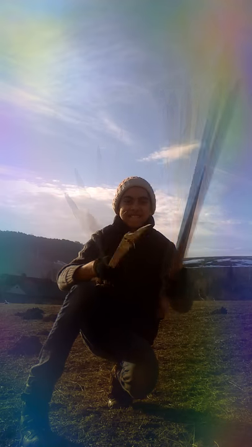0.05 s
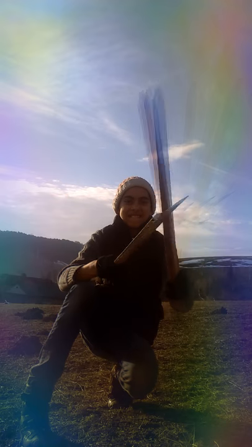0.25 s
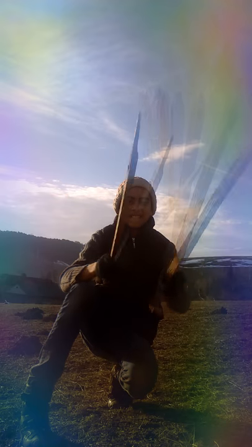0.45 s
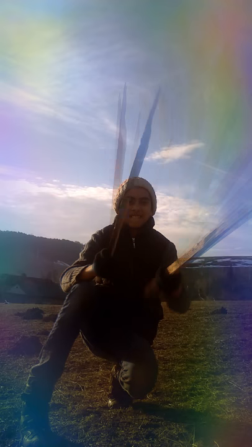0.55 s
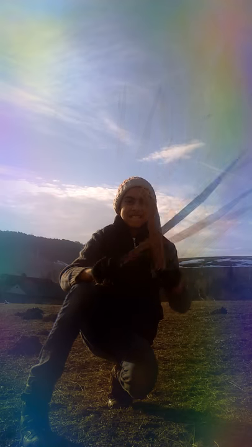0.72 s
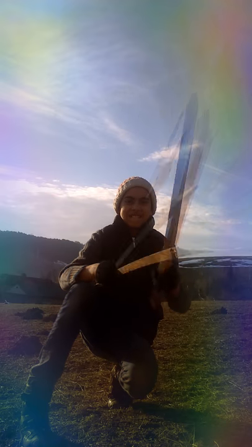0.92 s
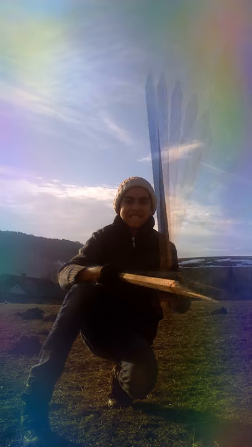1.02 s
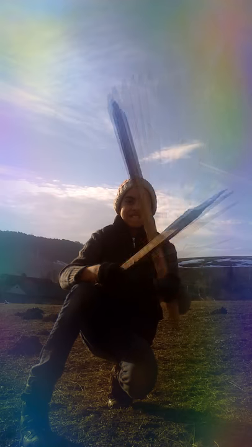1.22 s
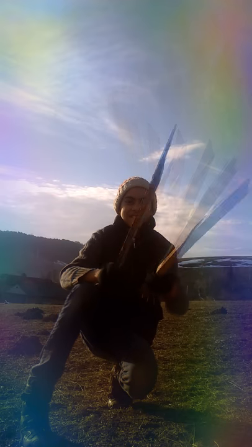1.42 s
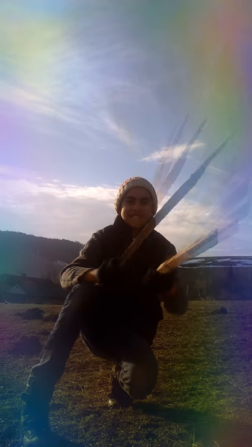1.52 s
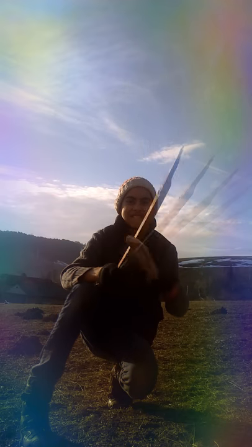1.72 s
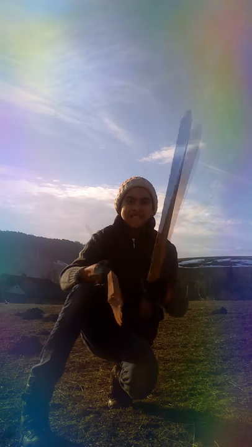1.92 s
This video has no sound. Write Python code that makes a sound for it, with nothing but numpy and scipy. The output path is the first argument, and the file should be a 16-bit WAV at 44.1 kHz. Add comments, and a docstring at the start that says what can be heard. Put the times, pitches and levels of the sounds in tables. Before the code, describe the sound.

In an open field, two swung wooden sticks clack sharply five times near the microphone, briefly scraping as they slide apart before the final knock. A faint low drone and soft air hiss lie behind them.

```python
"""Stick fight in an open field

Two wooden sticks knock together in five dry clacks, each a snap, a crack and a short ring with a quick
second contact; light scrapes follow as they slide apart. The swings push soft puffs of air. Behind them
a low engine-like drone slows under faint outdoor hiss. Two close microphone ports hear the bass in
nearly opposite phase, and a limiter ducks after the hardest clack."""
import sys
import numpy as np
from scipy import signal
from scipy.fft import rfft, irfft, next_fast_len
from scipy.io import wavfile
from scipy.ndimage import uniform_filter1d, minimum_filter1d, map_coordinates

SR = 44100
rng = np.random.default_rng(int(sys.argv[2]) if len(sys.argv) > 2 else 0)


def master(y):
    """Save y as 16-bit WAV."""
    cut = np.clip(np.atleast_2d(y).T, -1, 1)
    pcm = np.round(cut * 32767)  # scale
    wavfile.write(sys.argv[1], SR, pcm.astype(np.int16))


N = 85995

# colour of the air bed: freq_hz, level_db
HISS_EQ = [(20, 12), (55, 23), (100, 22.5), (170, 18.5), (280, 12.5), (600, 4), (1400, 1), (2600, 3),
           (3800, 1), (5200, -4), (14000, -6), (15600, -6), (16100, -35)]
# how alike the bed is left and right: freq_hz, correlation
HISS_CORRELATION = [(60, -0.92), (160, -0.93), (300, -0.61), (640, -.3), (1400, -0.13), (3100, 0.1),
                    (7000, 0)]
# the far drone winding down: time_s, firing_rate_hz, level_db
DRONE_PATH = [(0, 42.2, -57), (.2, 42, -56.5), (.35, 41.3, -59.5), (.8, 40.44, -59), (1.05, 39.53, -61.5),
              (1.4, 38, -64.5), (1.6, 37.7, -58.5), (1.95, 38, -62.5)]
# its harmonics: rate_multiple, level_db
DRONE_HARMONICS = [(1, -9), (2, 0.5), (3, -12.5), (4, -10), (5, -19.5)]
# air pushed at the microphone by the swings: centre_s, width_s, level_db
AIR_PUFFS = [(.02, .01, -67), (.078, .011, -62), (.222, 0.011, -60), (0.986, 0.017, -68.5)]
# bassy colour of a puff: freq_hz, level_db
PUFF_EQ = [(20, -6), (70, -0.5), (110, -3.5), (250, -24), (1000, -59.5)]
# bending modes of the hand-held sticks: pitch_hz, level_db, t60_s
WOOD_MODES = [(600, -10.5, .02), (790, -2, .015), (990, 3, .016), (1368, -3.5, .015), (1607, -8, .013),
              (1870, -4.5, 0.017), (2063, 2.5, 0.016), (2250, -9, .015), (2677, -0.5, 0.015),
              (3110, 2, 0.014), (3422, -11, .012), (3840, -7.5, .013), (4183, -2.5, 0.028),
              (4720, -10.5, .016)]
# the sticks graze each other: start_s, hold_s, wood_db, rasp_db
GRAZES = [(1.2252, .001, -62, -52), (1.281, .0015, -45, -50), (1.2915, 0.0058, -52.5, -61.5),
          (1.309, 0.008, -63, -67), (1.3248, .007, -58, -63.5), (1.3847, .005, -49, -54),
          (1.391, .004, -52, -57), (1.4045, .004, -49, -56), (1.4083, .003, -45, -38.5),
          (1.413, .006, -53.5, -56.5)]
# bright colour of bark rasp and contact snap: freq_hz, level_db
RASP_EQ = [(500, -25), (3000, 0.5), (6000, -4.5), (9000, -3.5), (13000, 1), (16000, -4)]
# colour of the dense, splintery part of a clack: freq_hz, level_db
CRACK_EQ = [(60, -20), (300, -9.5), (700, -1.5), (3000, -1.5), (5000, -6), (7000, -9.5), (10000, -13),
            (16000, -18.5)]
# borders of the seven bands that voice a clack: edge_hz
CLACK_BAND_EDGES = [250, 650, 1200, 1900, 3500, 5500, 9000, 16000]
# the hits: start_s, pitch_factor, ring_factor, rebound_ms, rebound_db, hum_db, then band_db for each band
HITS = [(0.2284, 1.0, .85, 1.92, -13, -64, -45, -33.5, -29, -14.5, -28.5, -48, -51),
        (0.4096, .96, 1.02, 1.08, -2.5, -68, -45.5, -34, -36, -33.5, -44, -49, -57.5),
        (0.7697, 1.02, .92, .48, -1.5, -65.5, -44.5, -31.5, -44, -40.5, -40, -49, -47.5),
        (1.2658, 1.07, 1.06, 3.6, -15, -62, -42, -40.5, -33, -36, -45, -51.5, -55),
        (1.6902, 1.0, .88, 3.7, -2, -43.5, -38, -23, -28.5, -29, -35, -48.5, -49)]
# colour of the field's reflections: freq_hz, level_db
ECHO_EQ = [(200, -10.5), (900, -4), (2200, 1), (4000, -4), (12000, -12)]
# phase between the microphone ports: freq_hz, left_lead_rad
PORT_LEAD = [(100, -3.0), (450, -2.5), (1100, -2.5), (1550, -0.72), (2000, -1.19), (2800, -1.62),
             (3400, -0.23), (4200, 1.5), (8000, 20.5), (16000, 52)]
# balance between the ports: freq_hz, left_minus_right_db
PORT_PAN = [(200, 1.5), (800, -1), (1400, -3.5), (2100, 1.5), (3000, 4), (5000, 5), (8000, 2.5),
            (12000, 15)]

HISS_DB = -63.5
DRONE_WAVER_DB, DRONE_JITTER_RAD = 2, .085
SCRAPE_RISE_S, SCRAPE_T60_S, GRAIN_SCATTER_DB = .0004, .009, 3.5
GRAZE_LOW_HZ, GRAZE_TOP_HZ = 1230, 3320  # a graze excites the middle modes
GRAZE_RING, GRAZE_PITCH = 1.46, .96  # loosely touching sticks ring longer and lower
ATTACK_S, MODE_SCATTER_DB = .00012, 1.54
SNAP_DB, SNAP_T60_S, CRACK_DB, CRACK_T60_S = -3.5, .0019, 3, .023
BLOW_CUT_HZ, REBOUND_CUT_HZ = 330, 1300  # thin sticks radiate little bass, the second contact even less
HUM_HZ, HUM_T60_S = 186, .25  # the slow bend of a whole stick
GROUND_DB, GROUND_T60_S, FAR_DB, FAR_T60_S = -36.5, .08, -54, .7
LIMIT, LIMIT_RELEASE_S, TOP_HZ = .85, .063, 16000


def amp(db):
    """Decibels to gain."""
    return 10 ** (np.asarray(db) / 20)


def unit(x):
    """Scale to rms 1."""
    return x / np.sqrt(np.mean(x ** 2) + 1e-20)


def fade(t, t60):
    """Exponential decay, 60 dB down at t60."""
    return np.exp(-np.log(1000) * t / t60)


def along(points, hz):
    """Read a curve of (freq_hz, value) points on a log frequency axis."""
    freqs, values = np.transpose(points)
    return np.interp(np.log(hz + 1), np.log(freqs + 1), values)


def filtered(x, response):
    """Pass x through a complex frequency response."""
    n = x.shape[-1]
    padded = next_fast_len(n + SR // 10)
    return irfft(rfft(x, padded) * response(np.fft.rfftfreq(padded, 1 / SR)), padded)[..., :n]


def high_pass(x, hz):
    """Bass cut, 12 dB an octave."""
    return signal.sosfilt(signal.butter(2, hz, 'highpass', fs=SR, output='sos'), x)


def low_pass(x, hz):
    """Treble cut, 12 dB an octave."""
    return signal.sosfilt(signal.butter(2, hz, fs=SR, output='sos'), x)


def noise(eq, shape):
    """Coloured noise of rms 1."""
    return unit(filtered(rng.standard_normal(shape), lambda hz: amp(along(eq, hz))))


def wobble(rate_hz):
    """Smooth random modulation, rate_hz knots a second."""
    return map_coordinates(rng.standard_normal(N // 20), [np.arange(N) * rate_hz / SR])


def add(track, start_s, x):
    """Mix x into the track at start_s."""
    part = track[max(round(start_s * SR), 0):][:len(x)]
    part += x[:len(part)]


def hiss():
    """A steady bed of outdoor air and microphone noise, out of phase in the lows and wide on top."""
    def mid_side_gains(hz):
        angle = np.arccos(np.clip(along(HISS_CORRELATION, hz), -1, 1)) / 2
        return np.array([np.cos(angle), np.sin(angle)])
    mid, side = filtered(noise(HISS_EQ, (2, N)), mid_side_gains)
    return amp(HISS_DB) * unit(np.array([mid + side, mid - side]))


def drone():
    """A low throb of wavering harmonics, like a far engine slowing down."""
    time_s, rate_hz, level_db = np.transpose(DRONE_PATH)
    t = np.arange(N) / SR
    phase = 2 * np.pi * np.cumsum(np.interp(t, time_s, rate_hz)) / SR + DRONE_JITTER_RAD * wobble(9.5)
    tone = sum(amp(db + DRONE_WAVER_DB * wobble(7.4)) * np.cos(multiple * phase)
               for multiple, db in DRONE_HARMONICS)
    return np.sqrt(2) * amp(np.interp(t, time_s, level_db)) * tone


def puffs():
    """The swings push soft, low swells of air at the microphone."""
    t = np.arange(N) / SR
    swells = sum(amp(db) * np.exp(-.5 * ((t - centre_s) / width_s) ** 2)
                 for centre_s, width_s, db in AIR_PUFFS)
    return noise(PUFF_EQ, N) * swells


def field_echo(x):
    """Weak, short scatter from the ground and a faint tail from the far field."""
    t = np.arange(SR // 2) / SR
    tail = sum(amp(db) * unit(noise(ECHO_EQ, (2, len(t))) * fade(t, t60))
               for db, t60 in ((GROUND_DB, GROUND_T60_S), (FAR_DB, FAR_T60_S)))
    return signal.fftconvolve(x[None], tail / np.sqrt(len(t)), axes=1)[:, :N]


def wood_ring(t, pitch_factor, ring_factor):
    """The sticks' modes ring out after one touch; the grip shifts their pitch and damping."""
    out = np.zeros(len(t))
    for hz, db, t60 in WOOD_MODES:
        envelope = amp(db + rng.normal(0, MODE_SCATTER_DB)) * fade(t, t60 * ring_factor)
        out += envelope * np.sin(2 * np.pi * hz * pitch_factor * t)
    return out


def scrapes():
    """Rough bark catches in tiny grains that rasp and lightly ring the wood."""
    n = SR // 10
    out, t = np.zeros(N), np.arange(n) / SR
    for start_s, hold_s, wood_db, rasp_db in GRAZES:
        stroke = (1 - np.exp(-t / SCRAPE_RISE_S)) * fade(np.maximum(t - hold_s, 0), SCRAPE_T60_S)
        rasp = stroke * unit(noise(RASP_EQ, n) * amp(GRAIN_SCATTER_DB * rng.standard_normal(n)))
        friction = stroke * rng.standard_normal(n)
        wood = signal.fftconvolve(friction, wood_ring(t, GRAZE_PITCH, GRAZE_RING))[:n]
        wood = low_pass(high_pass(wood, GRAZE_LOW_HZ), GRAZE_TOP_HZ)
        add(out, start_s, amp(rasp_db) * rasp + amp(wood_db) * unit(wood) * np.std(stroke))
    return out


def contact(t, pitch_factor, ring_factor):
    """One touch of wood on wood: a bright snap, a splintery crack and the ringing body."""
    snap = amp(SNAP_DB) * fade(t, SNAP_T60_S) * noise(RASP_EQ, len(t))
    crack = amp(CRACK_DB) * fade(t, CRACK_T60_S * ring_factor) * noise(CRACK_EQ, len(t))
    return (snap + crack + wood_ring(t, pitch_factor, ring_factor)) * (1 - np.exp(-t / ATTACK_S))


def voiced(x, band_db):
    """EQ a hit toward band_db: each band's rms level if all its energy fell within 10 ms."""
    n, edges = len(x), np.array(CLACK_BAND_EDGES)
    hz = np.fft.rfftfreq(2 * n, 1 / SR)
    centres = np.sqrt(edges[1:] * edges[:-1])
    bands = [(hz > low) & (hz < high) for low, high in zip(edges, edges[1:])]
    spectrum = rfft(x, 2 * n)
    for _ in range(4):
        energy = np.array([np.sum(abs(spectrum[band]) ** 2) / n for band in bands])
        boost_db = np.array(band_db) - 10 * np.log10(energy / (SR / 100))
        cepstrum = irfft(np.log(amp(along(np.c_[centres, boost_db], hz))))
        minimum_phase = np.r_[cepstrum[0], 2 * cepstrum[1:n]]  # nothing rings ahead of the attack
        spectrum *= np.exp(rfft(minimum_phase, 2 * n))
    return irfft(spectrum)[:n]


def clacks():
    """The sticks meet and touch again within a few milliseconds; where they meet sets the colour."""
    out, t = np.zeros(N), np.arange(SR // 5) / SR
    for start_s, pitch_factor, ring_factor, rebound_ms, rebound_db, hum_db, *band_db in HITS:
        blow = high_pass(contact(t, pitch_factor, ring_factor), BLOW_CUT_HZ)
        rebound = high_pass(contact(t, pitch_factor, ring_factor), REBOUND_CUT_HZ)
        add(blow, rebound_ms / 1000, amp(rebound_db) * rebound)
        hum = amp(hum_db) * fade(t, HUM_T60_S) * np.sin(2 * np.pi * HUM_HZ * t)
        add(out, start_s, voiced(blow, band_db) + hum)
    return out


def microphone_ports(x):
    """Mono to stereo: two close ports hear each frequency with different phase and level."""
    sides = np.array([[.5], [-.5]])
    def response(hz):
        gain = amp(sides * along(PORT_PAN, hz))
        gain /= np.sqrt(np.mean(gain ** 2, axis=0))  # constant power
        return gain * np.exp(1j * sides * along(PORT_LEAD, hz))
    return filtered(x, response)


def scene():
    """The mix: sticks up front with a touch of field echo, over drone, puffs and hiss."""
    sticks = clacks() + scrapes()
    return microphone_ports(sticks + drone()) + field_echo(sticks) + puffs() + hiss()


def record(dry):
    """A fast limiter with a slow release, then a steep cut of the top end."""
    release = np.exp(np.arange(N) / SR / LIMIT_RELEASE_S)
    overshoot = np.maximum(abs(dry).max(axis=0) / LIMIT - 1, 0)
    duck = np.maximum.accumulate(overshoot * release) / release  # jumps at a peak, then eases off
    gain = 1 / (1 + duck)
    gain = uniform_filter1d(minimum_filter1d(gain, size=32), size=32)  # smooth look-ahead attack
    return filtered(dry * gain, lambda hz: hz < TOP_HZ)


dry = scene()
out = record(dry)
master(out)
```